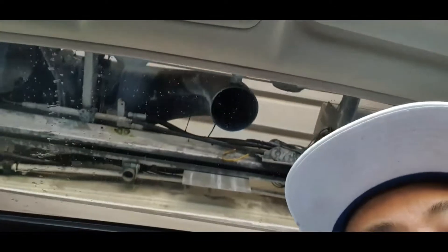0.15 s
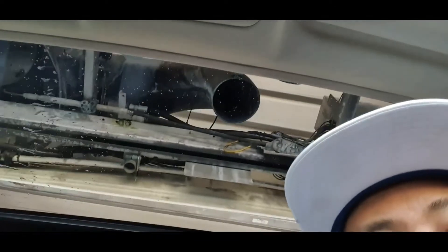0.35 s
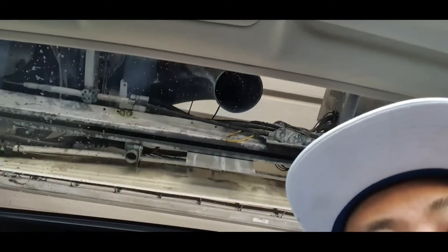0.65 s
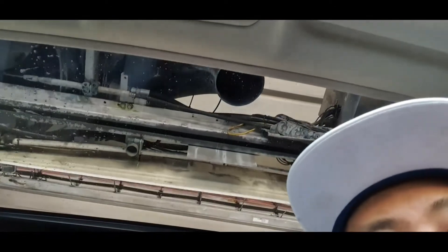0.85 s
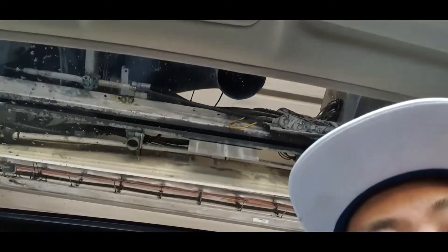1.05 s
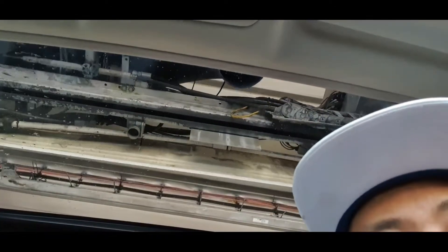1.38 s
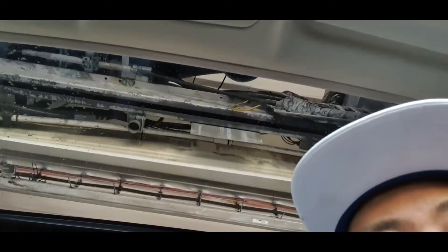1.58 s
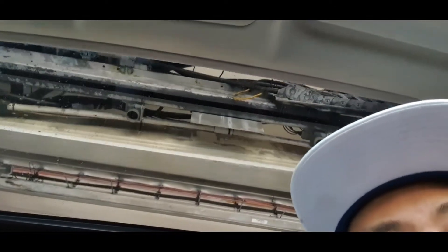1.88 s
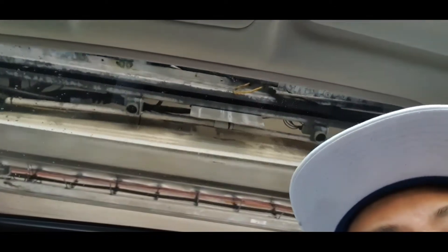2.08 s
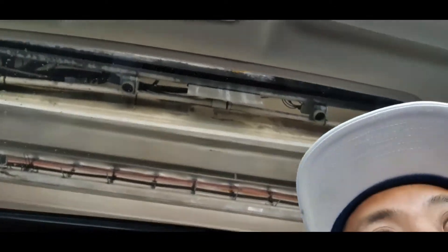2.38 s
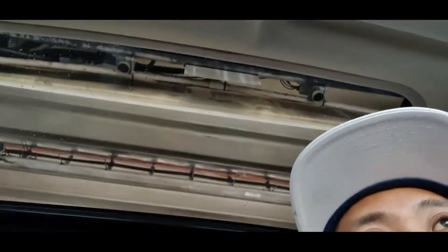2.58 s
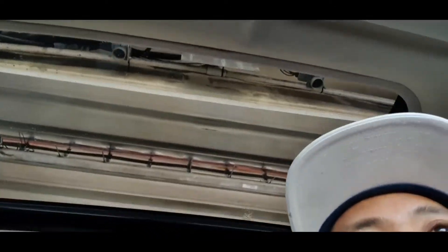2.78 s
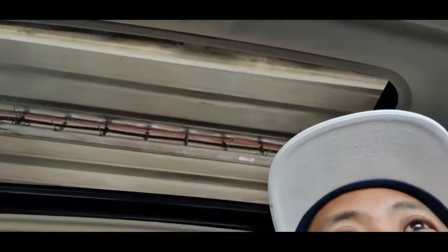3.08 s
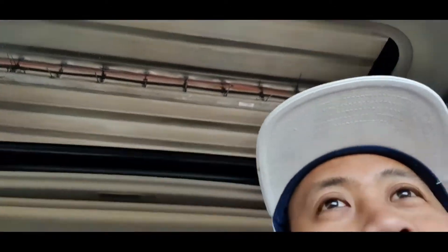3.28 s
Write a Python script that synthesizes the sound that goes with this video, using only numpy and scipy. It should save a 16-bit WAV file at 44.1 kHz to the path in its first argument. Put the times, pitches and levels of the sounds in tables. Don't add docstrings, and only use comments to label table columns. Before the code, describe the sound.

Loud, steady blower rush heard inside a car, with low buffeting, faint fan hum and soft thuds

```python
import sys
import numpy as np
from scipy import signal
from scipy.fft import rfft, irfft
from scipy.io import wavfile
from scipy.ndimage import uniform_filter1d

SR = 44100
rng = np.random.default_rng(int(sys.argv[2]) if len(sys.argv) > 2 else 0)


def int16_out(signal):
    q = np.round(np.clip(np.atleast_2d(signal).T, -1, 1) * 32767)
    wavfile.write(sys.argv[1], SR, q.astype(np.int16))


def ratio(d):
    e = np.asarray(d, float) / 20
    return 10 ** e


N = 152145
T = np.arange(N) / SR
HZ = np.maximum(np.fft.rfftfreq(N, 1 / SR), 1)

# columns t/s, jet level/dB, extra shading of the right port/dB
NOZZLE = [(0, 3.5, -0.5), (0.199, 4, -1), (.6, 4, -1.5), (.75, 3, -2.5), (1.5, 2, -1.5), (2.302, 2, -1),
          (2.598, 1, -1), (3.0, 0.5, -0.5), (3.24, 0, 0.5), (3.29, -0.5, -5.5), (3.36, -2, -2),
          (3.4, -0.5, -2.5), (3.45, 2.5, -5.5)]


def shape(points, peaks=()):
    p = np.array(points, float)
    db = np.interp(np.log(HZ), np.log(p[:, 0]), p[:, 1])
    db = db - 30 * np.abs(np.log2(np.clip(HZ, p[0, 0], p[-1, 0]) / HZ))
    for hz, width_hz, peak_db in peaks:
        db = db + peak_db / (1 + (2 * (HZ - hz) / width_hz) ** 2)
    return ratio(db)


def walk(rate):
    k = int(SR / rate)
    held = np.repeat(rng.standard_normal(N // k + 1), k)
    return 1.108 * uniform_filter1d(uniform_filter1d(held, k), k)[:N]


def turbulence(gain, gust_db, flicker_db, follow_db):
    spectrum = rfft(rng.standard_normal(N)) * gain * 8
    out = 0
    for octave in range(4, 15):
        part = np.cos(np.pi / 2 * np.clip(np.log2(HZ) - octave, -1, 1)) ** 2
        upper = np.clip(np.log2(2. ** octave / 260) / 2 + 0.5, 0, 1)
        motion_db = upper * (gust_db + follow_db) + flicker_db * walk(8.7)
        out = out + irfft(spectrum * part, N) * ratio(motion_db)
    return out


def roof(gust, jet_db):
    # f/Hz, level/dB per Hz
    drumming = [(22, -40), (36, -29.5), (65, -29), (100, -33), (200, -37), (420, -44.5), (950, -54.5),
                (1300, -67)]
    # f/Hz, width/Hz, level/dB
    cabin = [(48, 9, 0), (62.7, 11, 5.5), (121.7, 28, 3.5), (147, 8.3, 1), (215.4, 16.7, -8),
             (229, 19, 3.5), (290, 19, -0.5), (650, 71, 0.5), (774, 44, -3.5), (881, 81, 3.5),
             (1026, 17, 3)]
    drum = ratio(12.5) * turbulence(shape(drumming, cabin), 1.17 * gust, 0.23, jet_db)
    return np.array([drum * ratio(-1.4), drum])


def doors(gust, jet_db):
    # f/Hz, level/dB per Hz
    panels = [(22, -52), (60, -42), (88, -35.5), (135, -49.5), (250, -55), (420, -51), (700, -57.5),
              (2000, -66.5)]
    # f/Hz, width/Hz, level/dB
    door_modes = [(160, 38, 9.8), (225, 15, 2), (760, 120, 3), (980, 60, 5), (1850, 200, 5)]
    # t/s, level/dB
    bass_surge = [(0, 0), (.25, -1.5), (.7, 2), (.85, -3), (1.4, 0.5), (1.8, 0), (1.95, 7), (2.15, 1.5),
                  (2.33, -2.5), (2.43, 4), (2.6, -0.5), (3.0, 2.5), (3.1, 8), (3.25, 8), (3.3, -2),
                  (3.37, 7), (3.45, 9)]
    push = ratio(11) * turbulence(shape(panels, door_modes), 0.6 * gust, 1.5, jet_db)
    bass = irfft(rfft(push) / (1 + (HZ / 380) ** 4), N)
    push = push + bass * (ratio(np.interp(T, *np.array(bass_surge).T)) - 1)
    return np.array([push, -push])


def jet_hiss(gust, jet_db, shade_db):
    # f/Hz, level/dB per Hz
    hiss_left = [(500, -66.5), (1000, -56.5), (1900, -57.5), (2300, -62.5), (3500, -67.5), (5000, -80),
                 (9300, -87.5), (14000, -106)]
    hiss_right = [(500, -66), (1000, -56), (1900, -50.5), (2700, -59), (3700, -64.5), (5400, -75.5),
                  (9300, -91.5), (14000, -106)]
    # f/Hz, width/Hz, level/dB
    glass = [(1180, 520, -3), (1510, 124, 5), (1800, 23, 4.5)]
    port_left = [(7470, 410, -10.5), (8200, 2200, 5.5), (11700, 250, 3)]
    port_right = [(8280, 230, -0.5), (8450, 700, 8.5), (11500, 250, -0.5)]
    left = turbulence(shape(hiss_left, glass + port_left), 0.22 * gust, 0.31, jet_db)
    right = turbulence(shape(hiss_right, glass + port_right), gust, 0.49, jet_db + shade_db)
    return ratio(10.5) * np.array([left, right])


def air():
    s, jet_db, shade_db = np.array(NOZZLE).T
    jet_db, shade_db = np.interp(T, s, jet_db), np.interp(T, s, shade_db)
    gust = 0.5 * walk(4) + 1.14 * walk(25.03)
    return roof(gust, jet_db) + doors(gust, jet_db) + jet_hiss(gust, jet_db, shade_db)


def swells(table, length_s):
    phase_turns = rng.random(len(table))
    out = 0
    for (s, hz, db), turn in zip(table, phase_turns):
        envelope = np.exp(-((T - s) / length_s) ** 2)
        out = out + ratio(db) * envelope * np.sin(2 * np.pi * (hz * (T - s) + turn))
    return out


def boom():
    # t/s, f/Hz, peak level/dB
    buffets = [(0.051, 67, -11), (0.113, 43.3, -15.5), (0.234, 56.8, -11), (0.36, 59.5, -18),
               (0.44, 51, -12.5), (0.66, 47, -7.5), (0.787, 73.5, -17), (0.866, 66, -21.2),
               (1.004, 59.4, -16.5), (1.088, 43.4, -16), (1.127, 54, -15.5), (1.191, 68, -18),
               (1.2, 44.7, -15), (1.248, 64.4, -20.1), (1.327, 48.5, -14), (1.467, 43, -24),
               (1.517, 73, -31), (1.59, 52.5, -19), (1.676, 46, -15), (1.756, 49, -17.4),
               (1.841, 49, -12.5), (1.995, 46.6, -11), (2.107, 44, -16), (2.171, 56.3, -13.5),
               (2.259, 60, -13.5), (2.354, 49, -15), (2.433, 52.5, -16), (2.558, 48, -10.5),
               (2.627, 55.9, -13.5), (2.714, 50.4, -16), (2.804, 50, -22), (2.883, 46.5, -12),
               (2.994, 42.6, -12), (3.064, 55.7, -16.2), (3.127, 43.6, -18.5), (3.181, 63.4, -15),
               (3.262, 51.3, -11), (3.382, 74, -19), (3.437, 54.5, -26)]
    ripples = [(0.161, 123, -24), (0.213, 126, -26), (0.343, 146, -28), (0.377, 114, -21.5),
               (0.537, 148, -22), (0.572, 114, -20.1), (0.694, 104, -20), (0.903, 117, -19),
               (1.034, 125, -17.5), (1.083, 148, -24), (1.244, 140.4, -15.5), (1.349, 152, -17),
               (1.396, 128, -22.2), (1.455, 112, -18), (1.491, 121, -22), (1.56, 144, -20.5),
               (1.712, 107, -15.5), (1.976, 120, -12.5), (2.055, 76, -25), (2.073, 139, -18),
               (2.11, 106, -16), (2.446, 109, -18), (2.505, 89, -14.5), (2.534, 121, -17),
               (2.577, 121, -15.5), (2.698, 120, -26), (2.763, 78, -21.3), (2.772, 114, -21.5),
               (2.907, 108, -22), (2.941, 111, -16.5), (2.99, 124, -23), (3.212, 76, -10.5),
               (3.234, 107, -13.5), (3.383, 76.5, -11.5), (3.404, 154, -23.5), (3.443, 77, -16.5)]
    pane_knocks = [(.08, 356, -27.5), (.57, 301, -23.5), (.65, 297, -25.5), (.9, 255, -25),
                   (1.7, 262, -24.5), (1.8, 305, -26), (1.96, 290, -27.5), (2.28, 296, -23.5),
                   (2.8, 290, -27), (3.22, 296, -25), (3.37, 445, -29.5)]
    return ratio(-2) * swells(buffets, 0.041) + ratio(-4) * swells(ripples, 0.025) + swells(pane_knocks, 0.024)


def thud(s, hz):
    cycles = (T - s) * hz
    return np.exp(-cycles ** 2) * np.sin(2 * np.pi * cycles)


def bumps():
    # t/s, f/Hz, left level/dB, right level/dB
    hand_bumps = [(0.277, 106, -18, -27), (0.624, 200, -41, -17), (1.511, 75, -39, -20),
                  (1.674, 282, -23, -21), (2.001, 96, -15, -23), (2.411, 370, -35, -12),
                  (2.416, 88, -32, -11), (2.449, 90, -21, -23), (3.074, 155, -13, -23),
                  (3.08, 324, -12.5, -42), (3.154, 85, -10, -15.5), (3.227, 82, -16, -24),
                  (3.344, 120, -20, -20), (3.403, 240, -15, -26)]
    return sum(thud(s, hz) * np.array([[ratio(l_db)], [-ratio(r_db)]]) for s, hz, l_db, r_db in hand_bumps)


def flaps():
    # t/s, f/Hz, level/dB
    roof_flaps = [
        (0.52, 297, -21),
        (0.63, 220, -17),
        (1.963, 790, -16),
        (1.8, 263, -14.5),
        (3.07, 214, -15.5),
        (2.8, 97.74, -20),
    ]
    return sum(thud(s, hz) * ratio(db) for s, hz, db in roof_flaps)


def fans():
    # shaft rate/Hz, left level/dB, right level/dB of the blade tone
    blowers = [
        (59.15, -44, -46),
        (58.3, -57, -50.5),
        (57.92, -55, -56),
        (59.86, -59, -51.5),
    ]
    # t/s, left level/dB, right level/dB, lower tone level/dB
    fan_view = [(0, -1, -17, 7), (.35, -6, 3, -1.5), (.6, 0, 3, 9.5), (.8, 5, -5, 1.5), (1.15, 5, 4, 1.5),
                (1.35, 1, 1, -11), (1.55, 0, 10.5, 6.5), (1.72, -1, -3, -10), (1.85, -3, 2, 12),
                (2.05, 8.5, -1, -9), (2.22, 1, -2, 11), (2.4, -8, 3, -4.5), (2.62, 6, -8, -2.5),
                (2.75, 7, 1.5, 0), (3.149, 6, -0.5, 2), (3.3, 2, -9, 3.5), (3.45, 3, -9, 1)]
    s, *view_db = np.array(fan_view).T
    view = ratio([np.interp(T, s, v) for v in view_db])
    port_lag_rad = np.array([[0], [0.8]])
    out = 0
    for shaft_hz, l_db, r_db in blowers:
        shaft_turns = np.cumsum(shaft_hz * (1 + 0.00128 * walk(3.01))) / SR + rng.random()
        angle = 2 * np.pi * shaft_turns
        blade = np.sin(10 * angle + port_lag_rad) * ratio([[l_db], [r_db]]) * view[:2]
        wobble = 2 * np.pi * np.cumsum(shaft_hz * 0.0221 * walk(15)) / SR
        half = np.sin(5 * (angle + wobble)) * ratio(-45.5) * view[2]
        out = out + np.sqrt(2) * (blade * ratio(2.5 * walk(5.06)) + half)
    return out


def drops():
    # t/s, left level/dB, right level/dB, decay/s
    water_drops = [
        (1.547, -50.5, -45.5, 0.012),
        (1.578, -56, -60.5, .011),
        (2.22, -68, -61.5, .02),
        (2.33, -66.5, -68, 0.018),
        (2.68, -66, -69, 0.016),
        (3.384, -59, -59.5, 0.011),
        (0.05, -61, -67.5, .02),
    ]
    # f/Hz, level/dB
    splash_colour = [(3500, -19), (6500, 0.5), (9000, -6), (11500, -3.5), (14000, -11), (16000, -30.5)]
    fizz = irfft(rfft(rng.standard_normal((2, N))) * shape(splash_colour), N)
    envelope = 0
    for s, l_db, r_db, decay_s in water_drops:
        age = np.maximum(T - s, 0)
        rise = 1 - np.exp(-age / 0.0015)
        envelope = envelope + rise * np.exp(-age / decay_s) * ratio([[l_db], [r_db]])
    return 2 * envelope * fizz / fizz.std()


def scene():
    return air() + boom() + bumps() + flaps() + fans() + drops()


def roll_off(x):
    return signal.sosfilt(signal.butter(12, 14700, fs=SR, output="sos"), x)


def record(dry):
    fade = np.sin(np.pi / 2 * np.clip(np.minimum(T, T[::-1]) / 0.004, 0, 1)) ** 2
    return roll_off(dry * fade)


dry = scene()
out = record(dry)
int16_out(out)
```